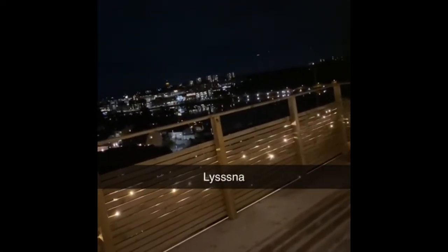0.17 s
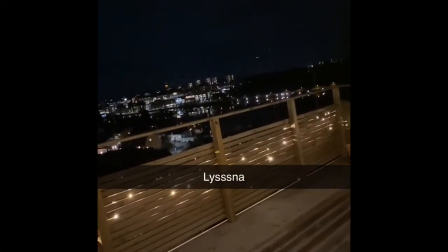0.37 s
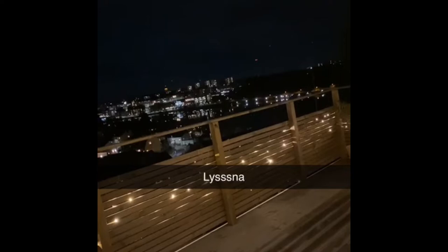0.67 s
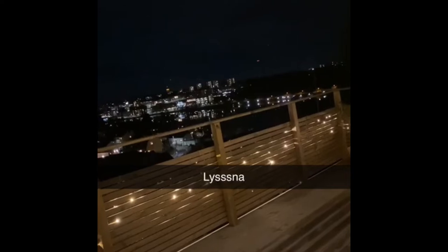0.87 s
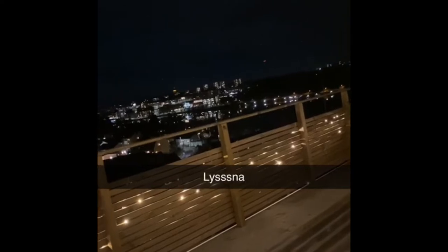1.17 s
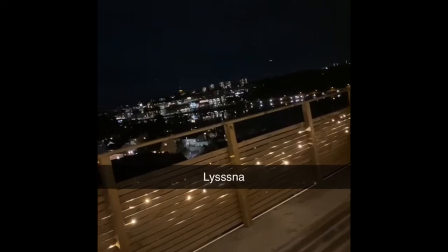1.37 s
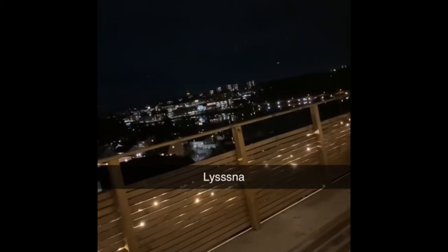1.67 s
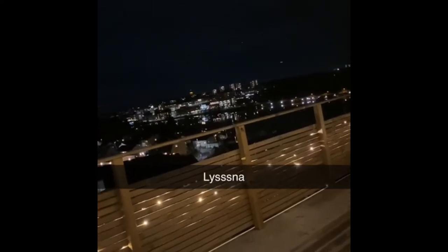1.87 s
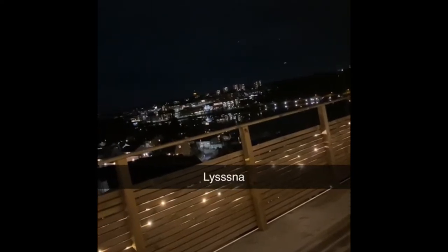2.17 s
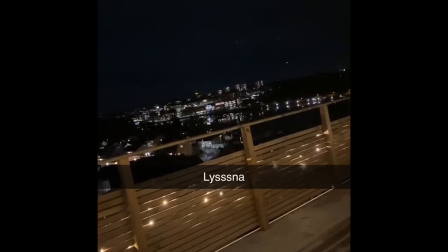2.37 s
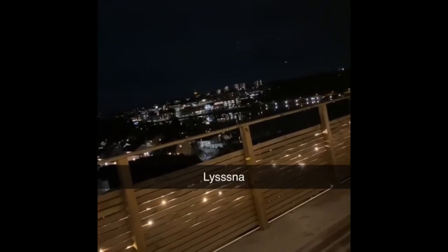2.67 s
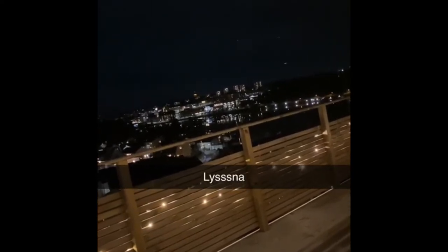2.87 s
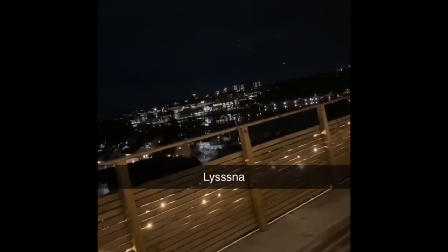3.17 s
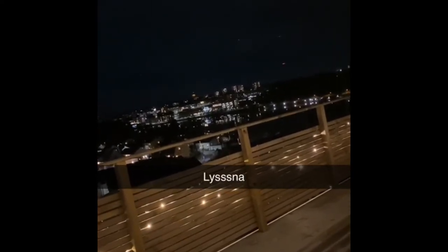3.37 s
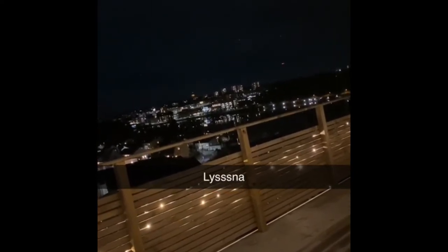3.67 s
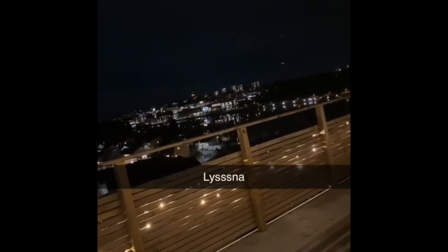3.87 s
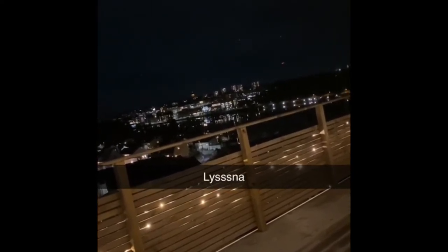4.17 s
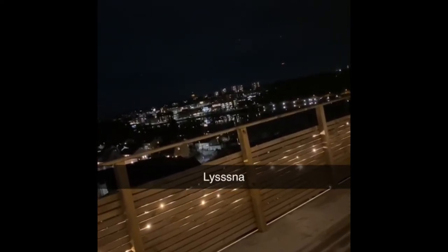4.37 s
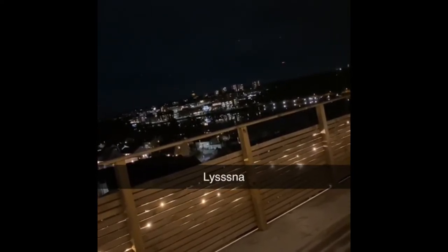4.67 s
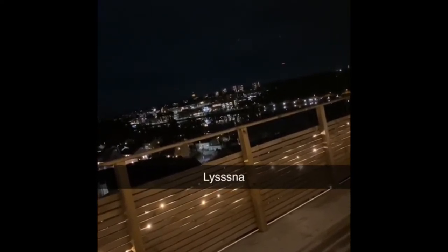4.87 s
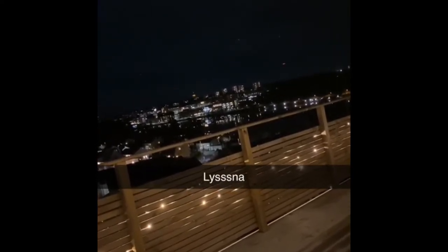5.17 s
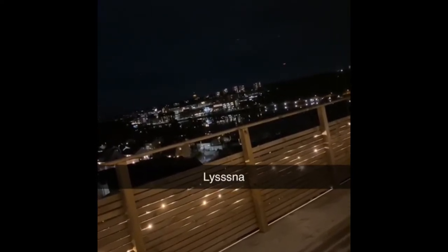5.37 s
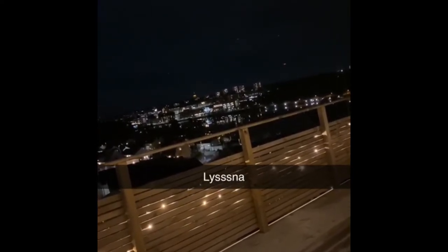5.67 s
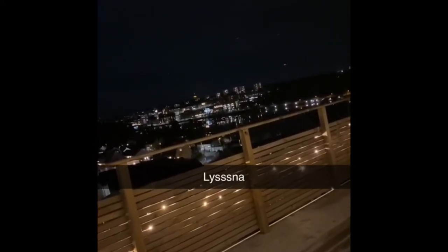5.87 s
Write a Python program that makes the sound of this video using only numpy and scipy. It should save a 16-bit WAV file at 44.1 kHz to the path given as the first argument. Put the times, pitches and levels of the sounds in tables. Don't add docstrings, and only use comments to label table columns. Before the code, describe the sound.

Three distant hoarse fox screams ring over a hillside town at night, echoing off houses, above low traffic hum and one close wooden crack.

```python
import sys
import numpy as np
from scipy import signal
from scipy.fft import rfft, irfft
from scipy.io import wavfile
from scipy.ndimage import uniform_filter1d

SR = 44100
rng = np.random.default_rng(int(sys.argv[2]) if len(sys.argv) > 2 else 0)


def natural_amplitude(level_db):
    exponent = np.asarray(level_db, float) / 20
    return 10 ** exponent


def bounce(signal):
    frames = np.transpose(np.atleast_2d(signal))
    limited = np.clip(frames, -1, 1)
    pcm = np.round(limited * 32767).astype(np.int16)
    wavfile.write(sys.argv[1], SR, pcm)


N = 266011

# frequency in Hz, level in dB per Hz.
HUM_SPECTRUM = [(12, -53), (20, -22.5), (38, -2), (108, -0.5), (157, -5.5), (235, -7.5), (371, -17),
                (402, -14.5), (652, -18.5), (948, -16), (1800, -34.5), (2490, -38), (3000, -39.5),
                (6020, -44.5), (12100, -57.5), (15700, -80.5), (22000, -120)]
# time in seconds, level in dB, length in seconds.
DECK_CRACKS = [
    (1.643, -69, 0.0058),
    (4.905, -35.5, 0.0065),
    (5.605, -67, 0.0029),
]
# frequency in Hz, level in dB per Hz.
CRACK_SPECTRUM = [(240, -34), (400, -2), (1390, -3.5), (2170, -9.5), (2910, -4.5), (3530, -14.5),
                  (4110, -4), (5200, -11.5), (5810, -7), (11000, -13.5), (14300, -58), (22000, -120)]
# frequency in Hz, level in dB, t60 in seconds.
BOARD_MODES = [(464, -1, 0.22), (695, -55, 0.037), (1065, 0, 0.1), (4200, -15, 0.094)]
# frequency in Hz, t60 in seconds.
TOWN_DECAY = [(1000, 1.4), (2150, 2.85), (3200, 0.48), (4400, 2.02), (7000, 1.37)]
# delay in seconds,
# level in dB for the first, the second and the third scream.
WALL_ECHOES = [(.035, -12, -7.5, -11.5), (.07, -18, -16.5, -9.5), (.142, -3.5, -6.5, -6),
               (.178, -10.5, -8, -9), (.26, -15, -17, -10), (.32, -14.5, -28, -18), (.43, -11, -15.5, -14),
               (.6, -33, -28, -16)]
# frequency in Hz, width in Hz, level in dB.
RASP_THROAT = [(934, 21, 1.5), (1105, 180, 9.5), (1273, 58, -2), (1500, 54, 0.5), (1780, 280, 2),
               (2470, 1500, -18.5), (2920, 50, -7.5), (3170, 2500, -21.5), (3830, 2350, -9.5),
               (5470, 1400, -18.5)]
# frequency in Hz, half width in Hz, level in dB.
CLEAR_THROAT = [(960, 60, 5), (1510, 35, -0.5), (1740, 120, -5.5), (2050, 300, -0.5), (2900, 140, -2),
                (3530, 150, 1), (4080, 300, 1.5)]
UPPER_PARTIALS_DB = [-13.5, -20, -27.5]
# start in seconds, climb in seconds, held note in Hz,
# jump of the low voice in seconds after the start, slide in seconds after the start.
SCREAM_SHAPES = [
    (.675, 0.24, 1082, .018, .42),
    (3.41, 0.19, 1084, .036, .355),
    (5.69, .26, 1072, .22, 0.303),
]
# time in seconds, effort in dB, low voice over high voice in dB,
# roughness from 0 to 1.
SCREAM_EFFORT = [
    [(.675, -73, 22, 0.96), (.705, -43, 18, 1.11), (.79, -45, 3, 0.92), (.89, -47, 5.5, 0.69),
     (1.0, -52.5, 2.5, 0.78), (1.05, -50.5, -28, .4), (1.22, -47.5, -27, 0.45), (1.36, -51, -29, 0.53),
     (1.51, -65, -24, 0.33)],
    [(3.41, -64, 10, 1), (3.44, -62.5, 5, 1.1), (3.455, -46.5, 20, .85), (3.53, -46, 4.5, .95),
     (3.59, -46.5, -9.5, 0.59), (3.71, -44, -7.5, 0.5), (3.86, -53, -40, 0.28), (4.04, -53, -25, 0.53),
     (4.17, -57.5, -27, 0.45)],
    [(5.69, -60, 24, 0.5), (5.73, -60, 5, .9), (5.785, -49, -7, 0.88), (5.88, -46.5, -7.5, 0.59),
     (5.96, -43.5, -6.5, 0.44), (6.01, -50, -14, 0.3), (6.4, -55, -23, 0.3)],
]


def evened(x):
    return x / np.sqrt(np.mean(x ** 2) + 1e-20)


def read(points, hz):
    f, value = np.transpose(points)
    return np.interp(np.log(hz + 1), np.log(f + 1), value)


def add(mix, s, sound):
    part = mix[round(s * SR):][:len(sound)]
    part += sound[:len(part)]


def noise(n):
    return rng.standard_normal(-(-n // SR) * SR)[:n]


def wander(n, span_s):
    size = int(span_s * SR)
    return evened(uniform_filter1d(uniform_filter1d(noise(n), size), size))


def resonate(x, hz, width):
    r = np.exp(-np.pi * width / SR)
    pole = r * np.exp(2j * np.pi * hz / SR)
    twice = np.convolve([1, -pole], [1, -pole])
    return 2 * signal.lfilter([(1 - r) ** 2], twice, x).real


def traffic_hum():
    frames, hz = N // 512 + 5, np.fft.rfftfreq(2048, 1 / SR)
    a, b, patches = rng.standard_normal((frames, 1025, 3)).T
    patches = evened(uniform_filter1d(uniform_filter1d(patches, 20, 0), 10, 1))
    swell = wander(frames * 512, 0.082)[::512]
    level_db = read(HUM_SPECTRUM, hz)[:, None] + 0.65 * patches + 0.13 * swell
    z = (a + 1j * b) * natural_amplitude(level_db)
    return natural_amplitude(-49.5) * evened(signal.istft(z, nperseg=2048, noverlap=1536)[1][:N])


def deck_boards():
    t, hz = np.arange(8192) / SR, np.fft.rfftfreq(8192, 1 / SR)
    ring = sum(natural_amplitude(db - 60 * t / t60) * np.sin(2 * np.pi * f * t) for f, db, t60 in BOARD_MODES)
    ring = ring * np.minimum(t / 0.013, 1)
    treble = 1 / (1 + (5000 / (hz + 1)) ** 4)
    out = np.zeros(N)
    for s, db, length in DECK_CRACKS:
        grains = rng.standard_normal(8192) * natural_amplitude(1.8 * rng.standard_normal(8192))
        slips = rfft(grains) * natural_amplitude(read(CRACK_SPECTRUM, hz))
        tick = np.minimum(t / 0.0007, 1) ** 2 * (natural_amplitude(4 - 9 * t / length) + natural_amplitude(-15 - 60 * t / 0.026))
        body = np.minimum(t / 0.0031, 1) ** 2 * (natural_amplitude(-6 * (t / length) ** 4) + natural_amplitude(-4.5 - 60 * t / 0.096))
        burst = irfft(slips * treble) * tick + irfft(slips * (1 - treble)) * body
        add(out, s - .002, natural_amplitude(db) * (burst / np.std(irfft(slips)) + 0.26 * ring))
    return out


def town_tail():
    taps = np.zeros(3 * SR)
    at = np.arange(400, 3 * SR - 20, 20)
    taps[at + rng.integers(0, 20, len(at))] = rng.choice([-1., 1.], len(at))
    hz, t, z = signal.stft(taps, SR, nperseg=256)
    decay = natural_amplitude(-60 * t / read(TOWN_DECAY, hz)[:, None])
    tail = signal.istft(z * decay, SR, nperseg=256)[1][:3 * SR]
    return tail / np.linalg.norm(tail)


def path_to_balcony(scream_index):
    n = np.arange(3000)
    path = natural_amplitude(-10) * town_tail()
    path[:16] = np.exp(-n[:16] / 2.66) / 2.77
    for delay, *db in WALL_ECHOES:
        smear = rng.standard_normal(3000) * (rng.random(3000) < .02) * np.exp(-n / (150 + 1500 * delay))
        smear[0] = 1.0
        air = np.exp(-n[:32] / (0.34 + 60 * delay ** 3))
        echo = np.convolve(smear / np.linalg.norm(smear), air / air.sum())
        add(path, delay, natural_amplitude(db[scream_index]) * echo)
    return path


def throat_db(hz):
    peaks = sum(natural_amplitude(2 * db) / (1 + ((hz - f) / w) ** 2) ** 2 for f, w, db in CLEAR_THROAT)
    return 10 * np.log10(natural_amplitude(2 * -10.5) + peaks)


def pitch(age, climb_s, note_hz, jump_s, slide_s):
    onset_share, wait_s, climb_bend = .69, .022, 1.9
    to_climb = np.clip((climb_s - age) / (climb_s - wait_s), 0, 1)
    arch = note_hz * (1 - (1 - onset_share) * to_climb ** climb_bend)
    sharp_hz = 20 * np.exp(-abs(age - climb_s) / 0.13)
    slide = (np.maximum(age - slide_s, 0) / (age[-1] - slide_s)) ** 2.15
    wobble = 1 + .026 * np.sqrt(slide) * wander(len(age), .009)
    high_hz = (arch + sharp_hz - 643.5 * slide) * wobble
    step_share, step_s, rise_s = .89, 0.046, .015
    first_jump = np.clip((age - jump_s) / rise_s + .8, 0, 1)
    second_jump = np.clip((age - jump_s - step_s) / rise_s, 0, 1)
    steps = step_share * first_jump + (1 - step_share) * second_jump
    return high_hz, np.maximum(arch, note_hz * steps), slide


def controls(start, climb_s, note_hz, jump_s, slide_s, effort):
    s, *columns = np.transpose(effort)
    age = np.arange(0, s[-1] - start, 1 / SR)
    effort_db, low_over_high_db, rough = (np.interp(start + age, s, c) for c in columns)
    hz, low_hz, slide = pitch(age, climb_s, note_hz, jump_s, slide_s)
    first_db = effort_db - 10 * np.log10(1 + natural_amplitude(-2 * low_over_high_db))
    second_db = effort_db - 10 * np.log10(1 + natural_amplitude(2 * low_over_high_db))
    jaws_db = -13.5 * np.clip(1 - age / 0.28, 0, 1) - 11.5 * slide
    fourth_db = second_db - 8.5 + jaws_db + throat_db(4 * hz)
    rasp_db = effort_db - 33 * (1 - np.clip(rough, 0, 1))
    return age, hz, low_hz, second_db + throat_db(2 * hz), first_db, fourth_db, rasp_db


def throat_rasp(t, deep):
    beat = np.exp(-(deep / (4 * np.pi) % 1) / 0.26)
    drive = 0.2 * evened(beat - beat.mean()) + evened(beat * noise(len(t)))
    mouth = np.clip(t / 0.1, 0, 1)
    rasp = np.zeros(len(t))
    for k, (f, w, db) in enumerate(RASP_THROAT):
        rasp += (-1) ** k * natural_amplitude(db) * mouth ** (f / 1500) * resonate(drive, f, w)
    return evened(rasp)


def scream(row, effort):
    t, hz, low_hz, second_db, first_db, fourth_db, rasp_db = controls(*row, effort)
    n = len(t)
    hoarse = np.clip((rasp_db + 64.5) / 14, 0, 1)
    shake = 1 + (0.0027 + .02 * hoarse ** 2) * wander(n, .005)
    high = 2 * np.pi * np.cumsum(hz * shake) / SR
    deep = 2 * np.pi * np.cumsum(low_hz * shake) / SR
    third, fifth, sixth = UPPER_PARTIALS_DB
    sixth_db = fourth_db + sixth + 12 * np.exp(-((6 * hz - 5700) / 600) ** 2)
    voice = np.zeros(n)
    for k, db in ((2, second_db), (4, fourth_db), (6, sixth_db)):
        voice += natural_amplitude(db + 2.83 * wander(n, 0.012)) * np.cos(k * high)
    settled = np.clip((t - .1) / .1, 0, 1)
    overtones = sum(natural_amplitude(db - 5.9 * hoarse) * np.cos(k * deep) for k, db in ((3, third), (5, fifth)))
    voice += natural_amplitude(first_db + 1.85 * wander(n, 0.023)) * (np.cos(deep) + settled * overtones)
    voice *= np.sqrt(2) * natural_amplitude(1.92 * wander(n, 0.0084))
    voice *= 1 + 0.33 * hoarse * wander(n, 0.0017)
    rasp = natural_amplitude(rasp_db + 0.87 * wander(n, 0.032)) * throat_rasp(t, deep)
    return (voice + rasp) * signal.windows.tukey(n, .03)


def fox():
    out = np.zeros(N)
    for k, row in enumerate(SCREAM_SHAPES):
        add(out, row[0], signal.fftconvolve(scream(row, SCREAM_EFFORT[k]), path_to_balcony(k)))
    return out


def scene():
    return (traffic_hum() + deck_boards() + fox())[None]


def masked(x, under_db, tilt_db, reach):
    hz, _, z = signal.stft(x, SR, nperseg=2048, noverlap=1024, window="cosine")
    edges = np.unique(np.geomspace(1, 1024, 84).astype(int) - 1)
    band = np.maximum.reduceat(abs(z) ** 2, edges, axis=0)
    shadow = signal.lfilter([0, 1], [1, -reach], band, axis=0)
    limit_db = under_db + tilt_db * np.clip(np.log2(hz[edges] / 2400 + 1e-9), -3, 1)
    keep = band > natural_amplitude(2 * limit_db)[:, None] * shadow
    z = z * np.repeat(keep, np.diff(edges, append=len(hz)), axis=0)
    return signal.istft(z, nperseg=2048, noverlap=1024, window="cosine")[1][:N]


def band_limit(x):
    return signal.sosfilt(signal.butter(12, 12240, fs=SR, output="sos"), x)


def record(dry):
    bass_cut = signal.butter(6, 37., "highpass", fs=SR, output="sos")
    top_cut = signal.firwin(511, 12230, window=("kaiser", 9), fs=SR)
    thin = signal.oaconvolve(signal.sosfilt(bass_cut, dry[0]), top_cut, "same")
    mix = masked(thin, under_db=-29.5, tilt_db=6.0, reach=0.46)[None]
    return band_limit(mix)


dry = scene()
out = record(dry)
bounce(out)
```